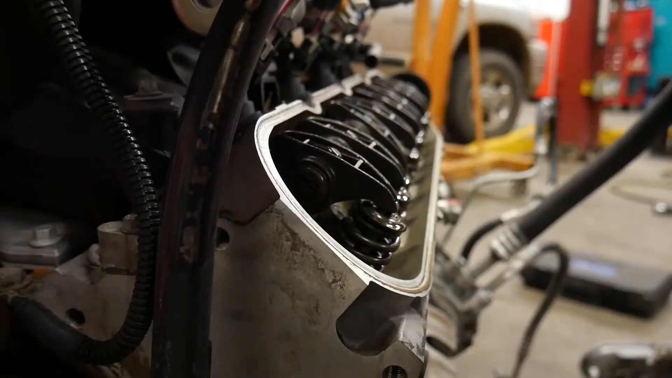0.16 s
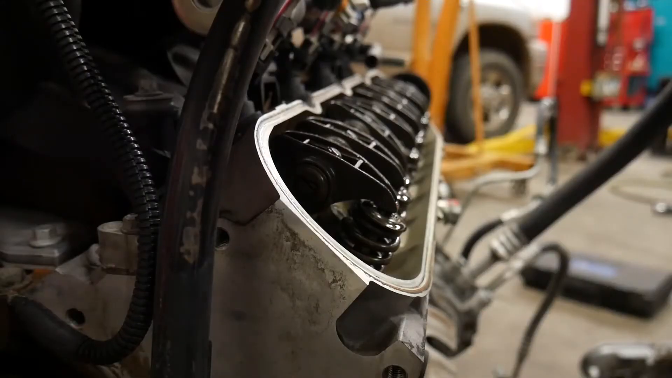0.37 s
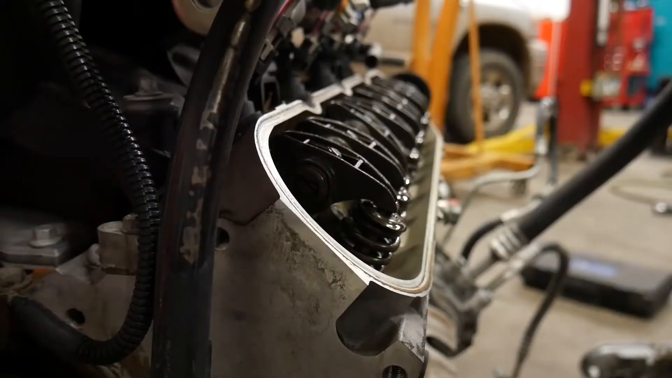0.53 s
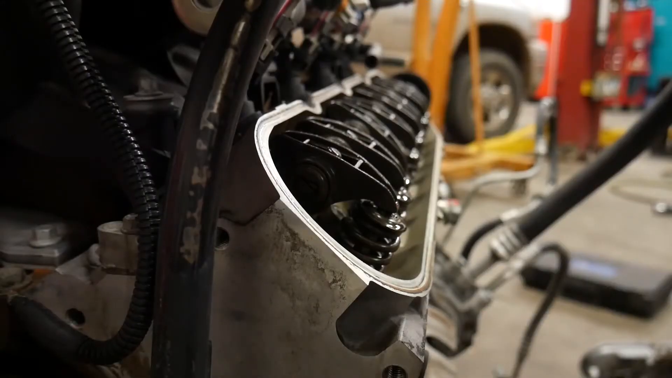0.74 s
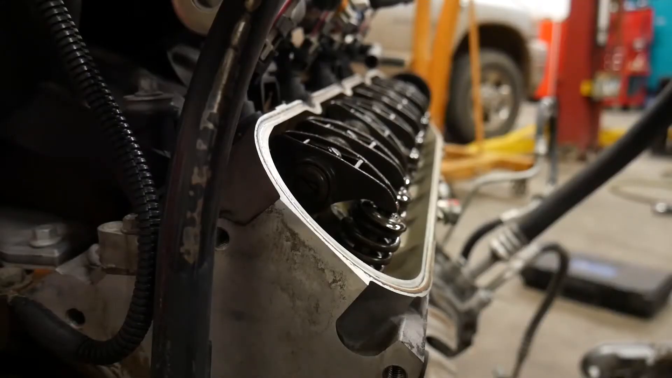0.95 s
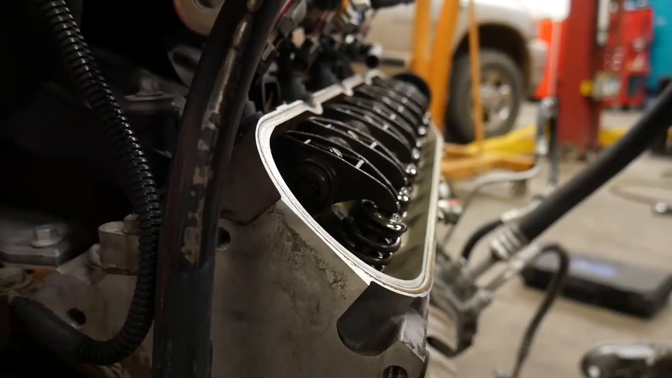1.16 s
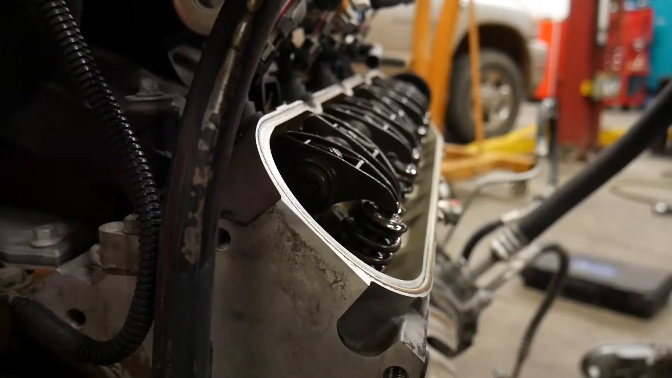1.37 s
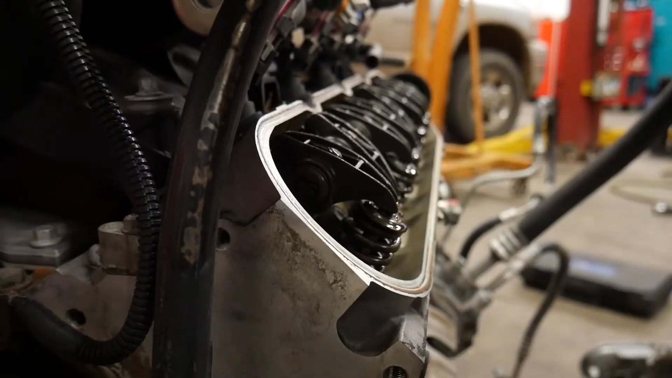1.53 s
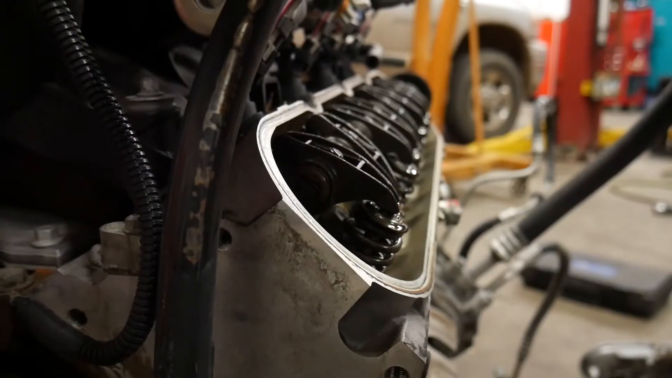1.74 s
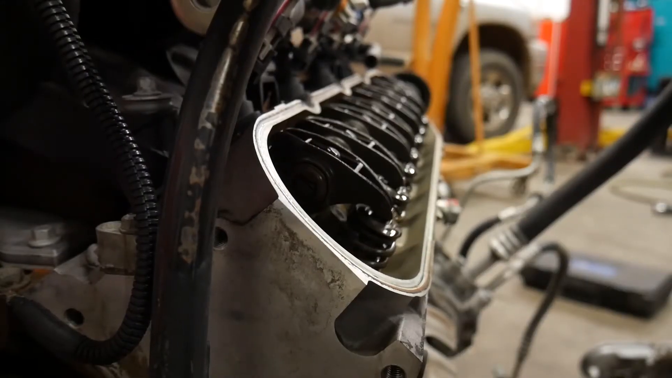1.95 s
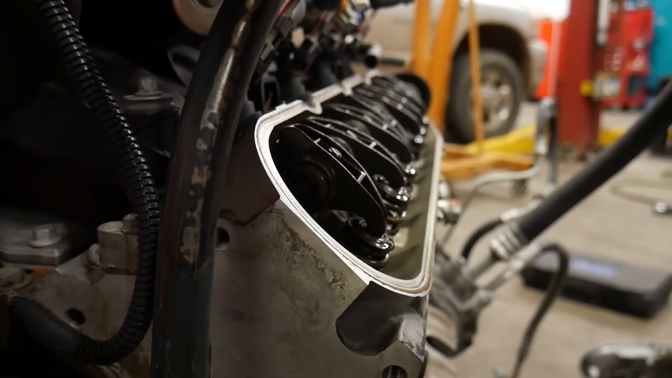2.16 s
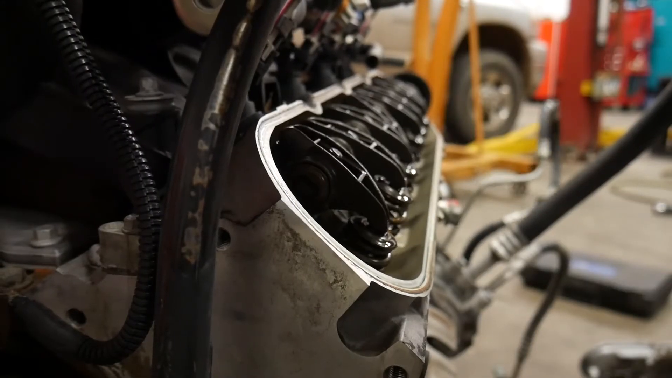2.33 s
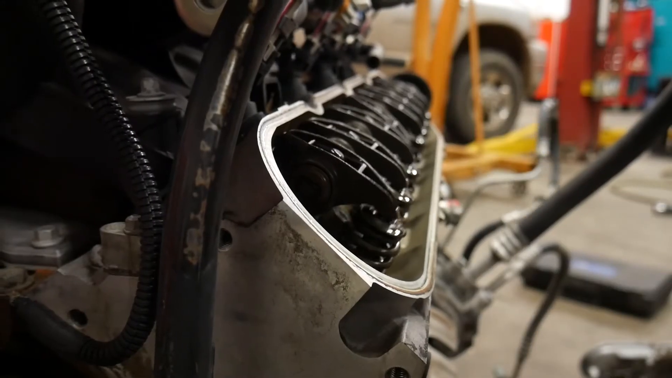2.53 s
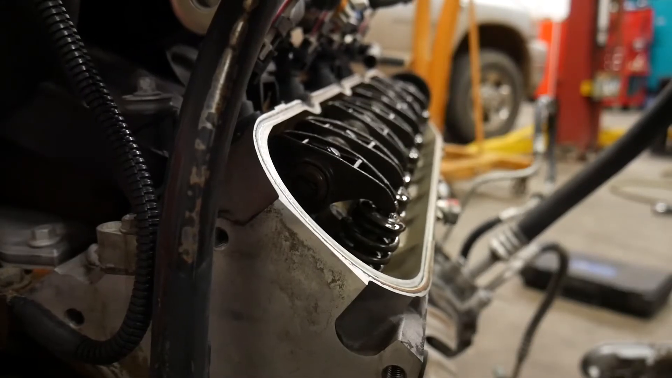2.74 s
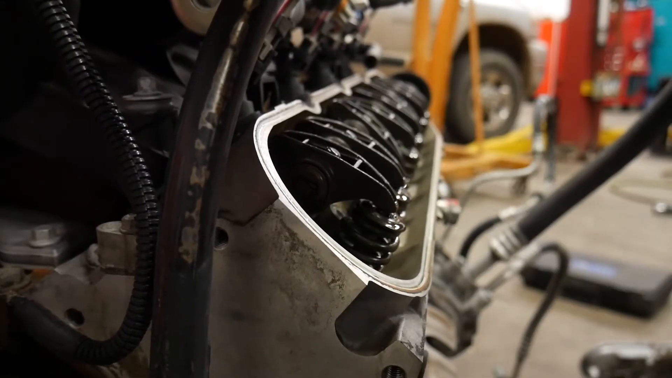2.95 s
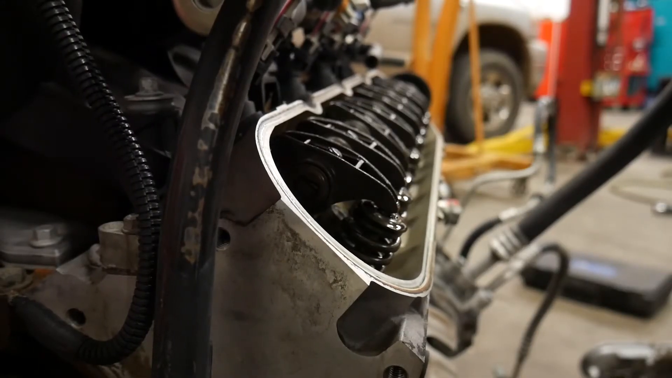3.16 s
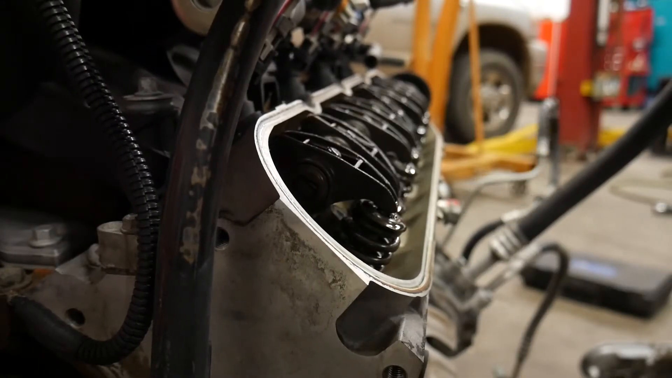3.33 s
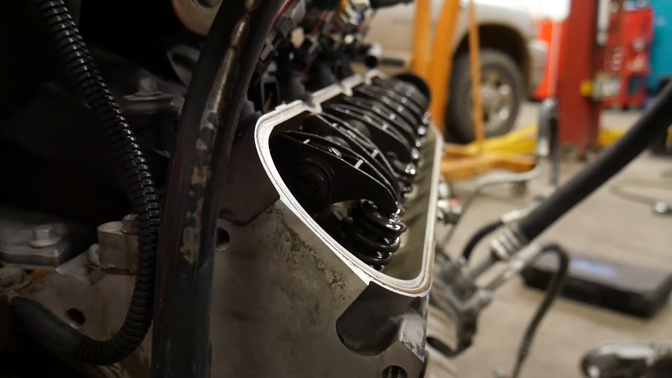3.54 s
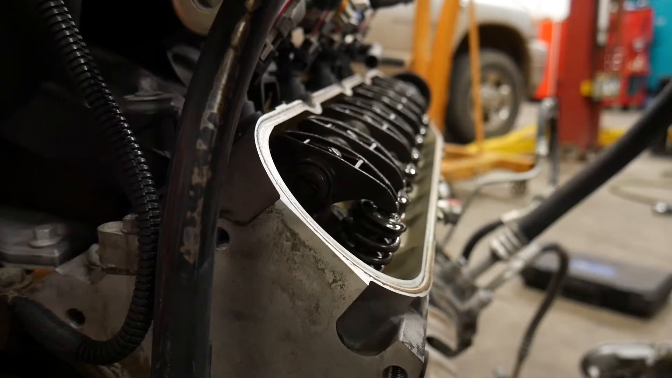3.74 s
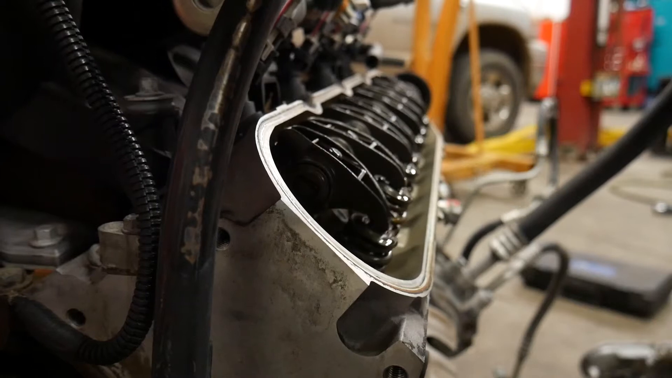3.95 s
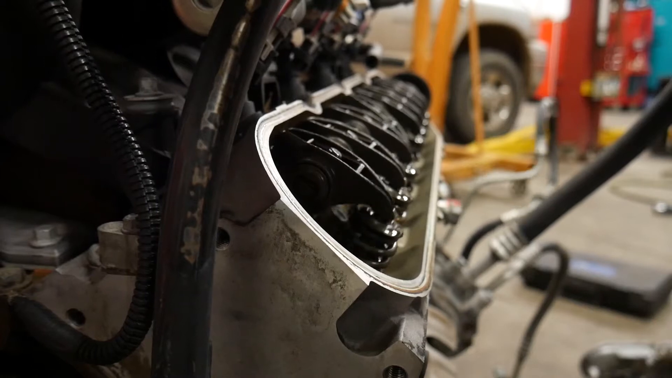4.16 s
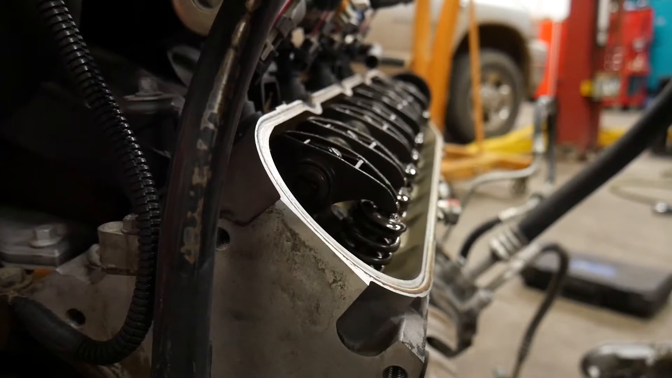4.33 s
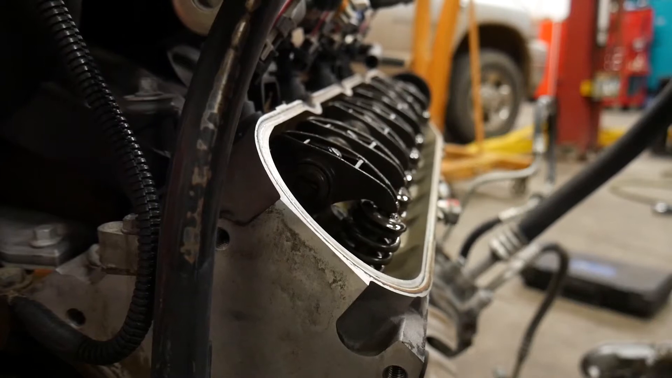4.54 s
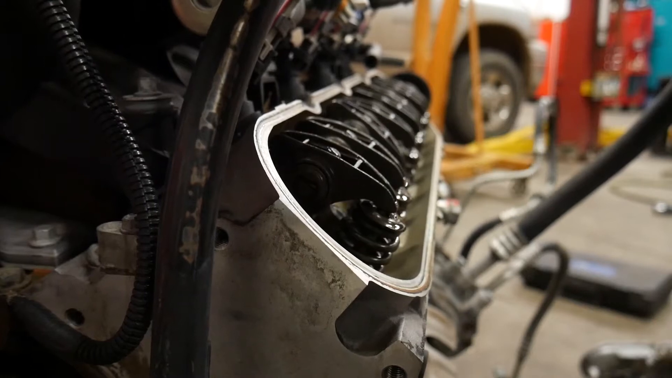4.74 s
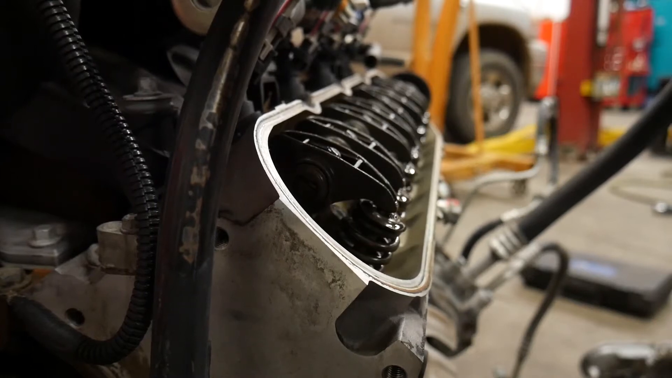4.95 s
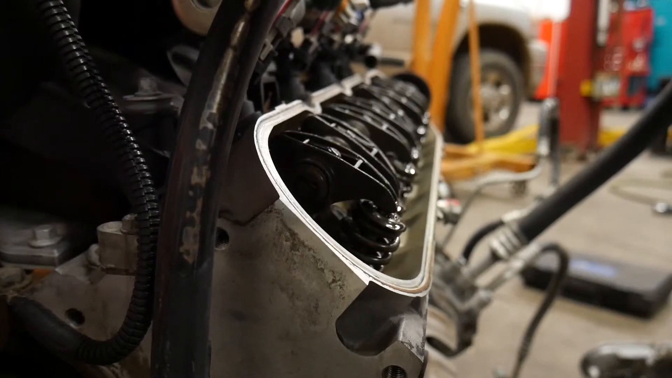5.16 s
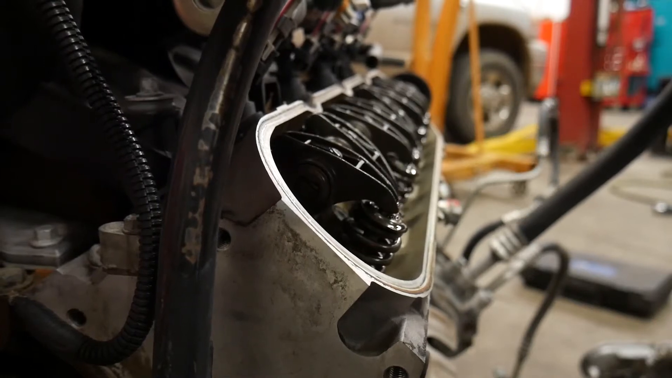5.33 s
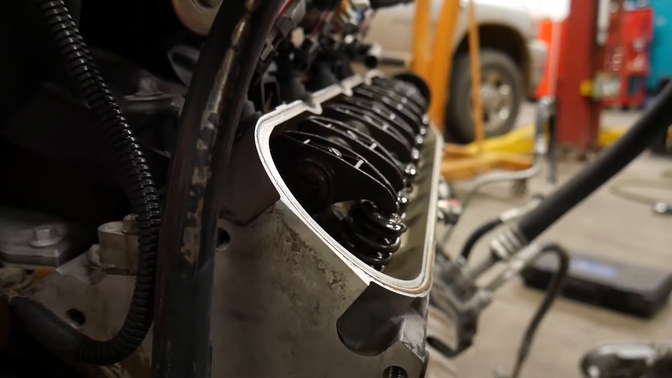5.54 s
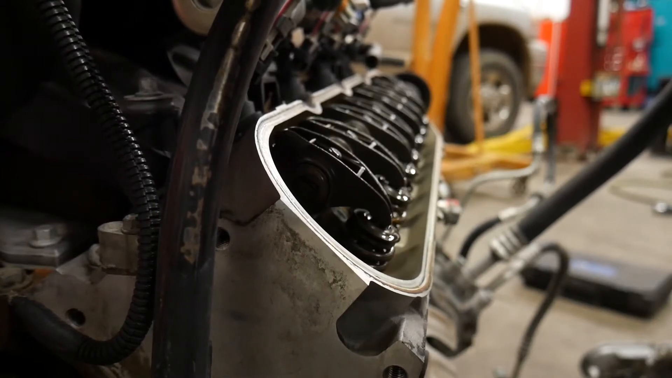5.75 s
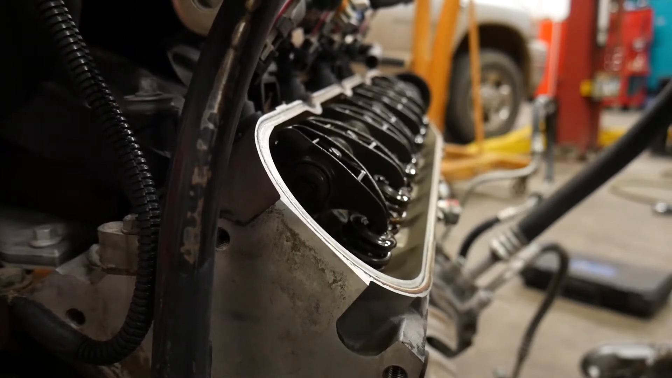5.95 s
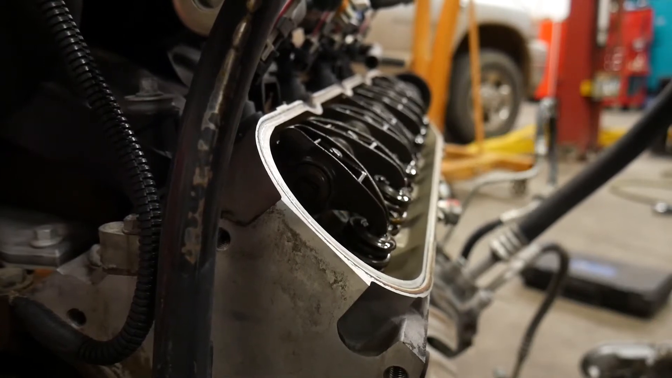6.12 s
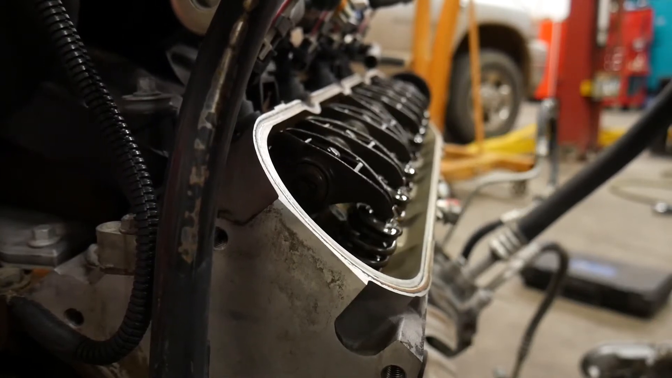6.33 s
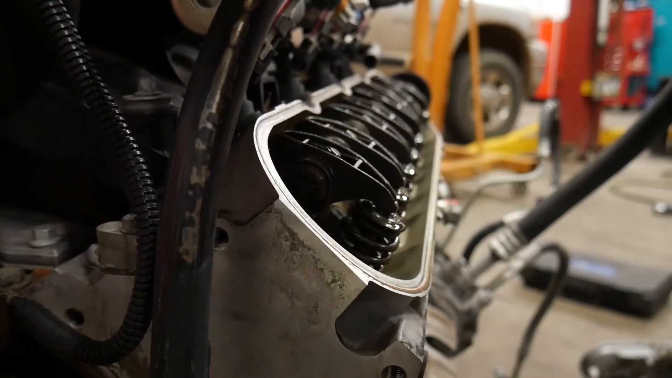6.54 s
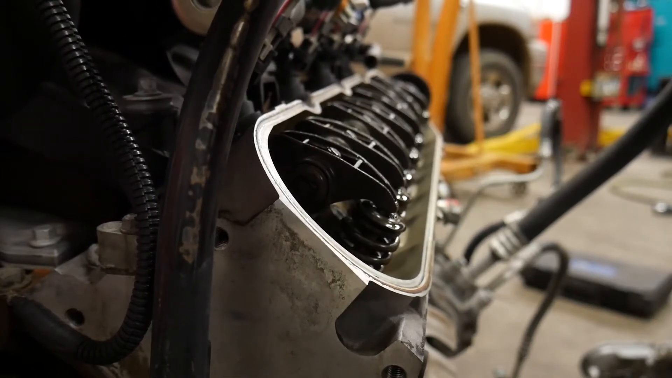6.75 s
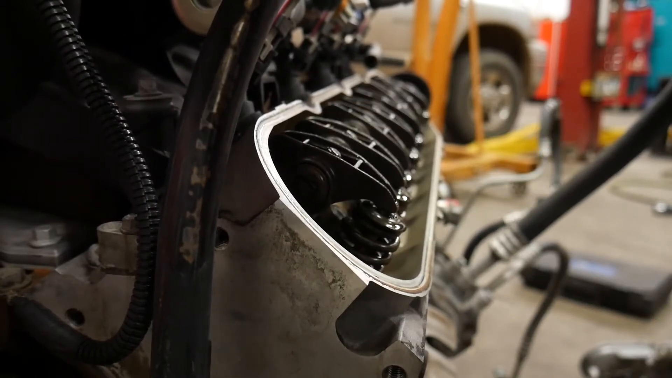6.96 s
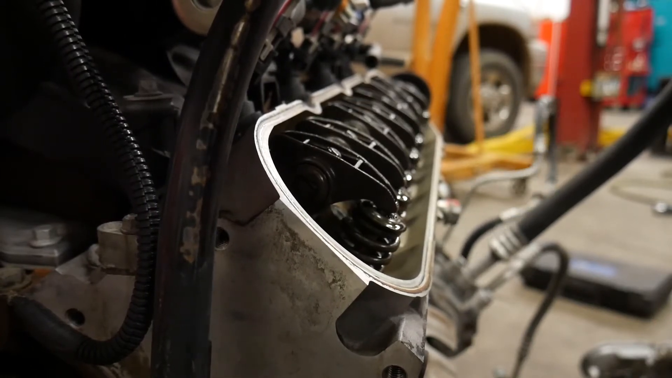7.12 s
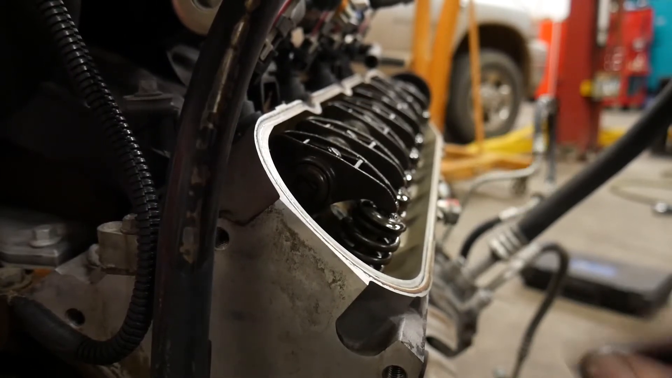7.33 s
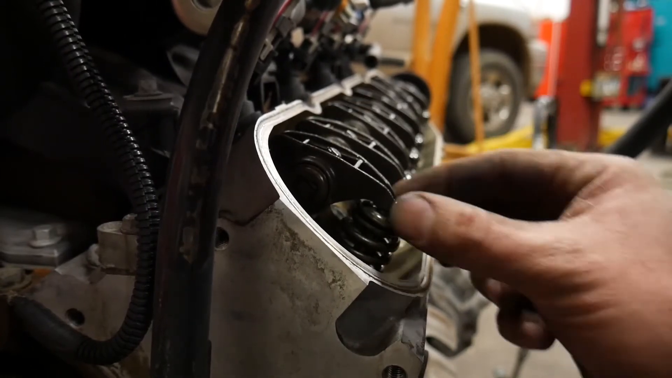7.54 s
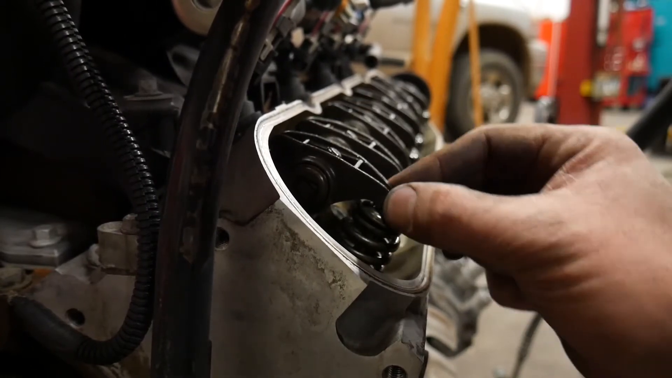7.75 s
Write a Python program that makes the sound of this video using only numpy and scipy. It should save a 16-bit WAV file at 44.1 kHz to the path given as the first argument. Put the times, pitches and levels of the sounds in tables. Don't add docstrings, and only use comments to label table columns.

```python
import sys
import numpy as np
from scipy import signal
from scipy.fft import rfft, irfft
from scipy.io import wavfile
from scipy.ndimage import uniform_filter1d

SR = 44100
rng = np.random.default_rng(int(sys.argv[2]) if len(sys.argv) > 2 else 0)


def waveform_to_disk(signal):
    frames = np.transpose(np.atleast_2d(signal))
    scaled = np.clip(frames, -1, 1) * 32767
    samples = np.round(scaled).astype(np.int16)
    wavfile.write(sys.argv[1], SR, samples)


def decibels_to_gain(level_db):
    exponent = np.asarray(level_db, float) / 20
    return 10 ** exponent


N = 343403
T = np.arange(N) / SR
BINS = np.fft.rfftfreq(8192, 1 / SR)

# t/s, peak/dB
CLUNKS = [
    (1.053, 0.5),
    (1.727, 0.5),
    (2.487, 0),
    (3.153, 1),
    (3.865, 0),
    (4.617, 1.5),
    (5.321, 1),
    (6.139, 1.5),
]
# t/s, peak/dB, thud/dB, mesh just after/Hz, drag/(Hz per s)
RELEASES = [
    (1.175, -16.5, -33, 1006, 1988),
    (1.881, -15, -39.5, 1188, 1851),
    (2.630, -18.5, -32.5, 1177, 1819),
    (3.302, -19, -33.5, 1233, 1883),
    (4.039, -18, -43.5, 1303, 1925),
    (4.738, -17.5, -32.5, 1111, 1739),
    (5.443, -17.5, -41, 1111, 1847),
    (6.268, -16.5, -33, 1091, 1797),
]


def evened(x):
    return x / np.sqrt(np.mean(x ** 2) + 1e-20)


def peaked(x):
    return x / abs(x).max()


def read(points, hz):
    f, value = np.transpose(points)
    return np.interp(np.log(hz + 1), np.log(f + 1), value)


def add(mix, s, sound):
    part = mix[round(s * SR):][:len(sound)]
    part += sound[:len(part)]


def causal(gain):
    log = np.log(np.maximum(np.r_[gain, gain[-2:0:-1]], 1e-5))
    return np.fft.ifft(np.exp(np.conj(signal.hilbert(log)))).real[:len(gain)]


def coloured(x, points):
    return signal.oaconvolve(x, causal(decibels_to_gain(read(points, BINS))))[:len(x)]


def wander(hz):
    slow = signal.butter(2, hz, fs=SR, output="sos")
    return evened(signal.sosfilt(slow, rng.standard_normal(N)))


def mesh_rate():
    # t/s, f/Hz
    spin_up = [(0, 0), (.022, 300), (.052, 667), (.077, 850), (.104, 1015), (.145, 1250), (.2, 1360)]
    mesh_delay_s, jolt_s = 0.008, 0.017
    full_hz, creep_hz = 1000, 69
    after_s, up_hz = np.transpose(spin_up)
    hz, load, jolt = np.full(N, -1e4), np.zeros(N), np.zeros(N)
    for (on, _), (off, _, _, start_hz, drag) in zip(CLUNKS, RELEASES):
        head_start = np.interp(hz[round(on * SR)], up_hz, after_s)
        rising = np.interp(T - on + head_start, after_s, up_hz)
        falling = start_hz - drag * (T - off)
        hz = np.where(T < on, hz, np.where(T < off, rising, falling))
        load[(T > on + mesh_delay_s) & (T < off)] = 1
        hz[(T > on) & (T < on + mesh_delay_s)] = hz[round(on * SR) - 1]
        jolt += np.exp(-((T - off) / jolt_s) ** 2)
    speed = np.maximum(hz + creep_hz, 0) / (full_hz + creep_hz)
    return [uniform_filter1d(v, size=400) for v in (np.maximum(hz, 0), load, speed, jolt)]


def motor():
    # order, level/dB
    loaded = [(1, -11.), (2, -13.), (3, -20.), (4, -11.), (5, -15.)]
    # order, level/dB
    coasting = [(1, -19.), (2, -9.5), (3, -11.5), (4, -11.), (5, -11.5)]
    # f/Hz, width/Hz, level/dB
    housing = [(458, 130, -13.5), (841, 178, -5), (1220, 152, 6), (2243, 74, -4), (2890, 100, -7.5),
               (3330, 30, -10.5), (4300, 100, -23.5), (5210, 150, -12.5), (6560, 400, -17.5),
               (6630, 170, -23), (7260, 100, -15.5), (7770, 51, -13.5), (8130, 68, -8.5), (8400, 19, -12),
               (8900, 72, -11.5), (9646, 150, -8), (10130, 230, -14), (10700, 98, -15), (11500, 270, -17.5)]
    # f/Hz, level/dB
    valleys = [(40, -60), (130, -18.5), (250, -21.5), (600, -24.5), (1500, -1.5), (3000, -15.5),
               (6000, -21.5), (9000, -24), (11500, -25.5), (13000, -25), (14500, -30.5), (16500, -29.5)]
    # f/Hz, level/dB
    whine_levels = [(1500, -60), (1900, -35), (2100, -25), (2550, -25), (2750, -35), (3300, -39),
                    (4000, -41)]
    # order, level/dB
    strands = [(1, -39.), (2, -41.), (4, -45.)]
    # loaded level/dB, its power of speed,
    # coasting level/dB, its power of speed, jolt at release/dB
    loudness = [(-24.5, .05, -27, 0.89, 1.6), (-25.5, 1.73, -26, 1.54, 0.5),
                (-37.5, 0.74, -37.5, 0.81, 6.6)]
    teeth, shaft_depth, knocks_per_s = 11, 0.087, 900
    hz, load, speed, jolt = mesh_rate()
    turns = np.cumsum(hz * (1 + 0.0162 * wander(44.8))) / SR

    tones = np.zeros(N)
    for (k, load_db), (_, coast_db) in zip(loaded, coasting):
        level = load * decibels_to_gain(load_db) + (1 - load) * decibels_to_gain(coast_db)
        contact = decibels_to_gain(np.minimum(6 * wander(24), 6) - 3)
        tones += level * contact * np.cos(2 * np.pi * (k * turns + rng.random()))

    throb = 1 + shaft_depth * np.cos(2 * np.pi * turns / teeth)
    knocks = (rng.random(N) < knocks_per_s / SR) * rng.choice([-1., 1.], N)
    brushes = rng.standard_normal(N) * decibels_to_gain(3 * np.tanh(.6 * wander(120)))
    grit = .55 * evened(knocks) + brushes
    drive = throb * (0.059 * grit + decibels_to_gain(-28.5) * tones)

    peaks = sum(decibels_to_gain(db) ** 2 / (1 + (2 * (BINS - f) / max(w, f / 70)) ** 2) ** 1.446 for f, w, db in housing)
    body = np.sqrt(peaks + decibels_to_gain(read(valleys, BINS)) ** 2)
    low = 1 / (1 + (BINS / 600) ** 8)
    high = 1 / (1 + (3500 / (BINS + 1)) ** 8)
    out, speed = np.zeros(N), abs(speed)
    spinning = hz > 300
    for row, share in zip(loudness, (1 - low - high, high, low)):
        load_db, load_power, coast_db, coast_power, jolt_db = row
        part = signal.oaconvolve(drive, causal(body * np.sqrt(abs(share))))[:N]
        level = load * decibels_to_gain(load_db) * speed ** load_power + (1 - load) * decibels_to_gain(coast_db) * speed ** coast_power
        out += level * decibels_to_gain(jolt_db * jolt) * part / part[spinning].std()

    whine_db = read(whine_levels, 3 * hz) + 4.5 * np.tanh(wander(80)) - 1
    whine = load * decibels_to_gain(whine_db) * np.cos(2 * np.pi * 3 * turns)
    for k, db in strands:
        whine += load * speed * decibels_to_gain(db + 6 * np.tanh(wander(50))) * np.cos(2 * np.pi * k * turns)
    return out + np.sqrt(2) * whine


def bell(x):
    # f/Hz, level/dB, t60/s
    modes = [(911, -38., 1.2), (2272, -39., 1.2)]
    t = np.arange(SR) / SR
    ring = sum(decibels_to_gain(db - 60 * t / t60) * np.sin(2 * np.pi * f * t) for f, db, t60 in modes)
    return signal.oaconvolve(x, ring / 20)[:N]


def clunks():
    # f/Hz, level/dB, t60/s
    strike = [(403, -7.5, 0.21), (1042, -5.5, 0.17), (1320, -2.5, 0.012), (1600, -28, 5.0),
              (2260, -31, 0.073), (2898, -7.5, 0.22), (3240, -50, 0.055), (3545, -24, 0.083),
              (4583, -26.5, 0.094), (6885, -18, 0.049), (7300, -29.5, 0.059), (8400, -39.5, 0.16),
              (11230, -20, 0.039), (11800, -32, 0.027)]
    # f/Hz, level/dB
    crack = [(59, -23.5), (100, -25), (552, -8), (1140, 3), (1680, -2.5), (2210, 2.5), (4030, -14.5),
             (5790, -13.5), (6450, -11.5), (7980, -12), (11200, -8.5), (13300, -17), (14500, -10),
             (15500, -13.5), (16500, -47)]
    t, out = np.arange(9000) / SR, np.zeros(N)
    contact = np.clip(t / 0.0013, 0, 1) ** 4 * (np.exp(-(t / 0.0067) ** 3) + 0.84 * np.exp(-t / 0.007))
    ring = sum(decibels_to_gain(db - 60 * t / min(t60, .06)) * np.sin(2 * np.pi * f * t) for f, db, t60 in strike)
    habit = rng.standard_normal(len(t))
    for s, db in CLUNKS:
        chatter = rfft(contact * (habit + .5 * rng.standard_normal(len(t))))
        chatter /= np.sqrt(uniform_filter1d(abs(chatter) ** 2, size=50))
        blow = irfft(chatter, len(t)) * (t > .0004)
        ringing = signal.oaconvolve(blow, ring)[:len(t)]
        sound = peaked(coloured(blow, crack)) + 0.21 * peaked(ringing)
        add(out, s, decibels_to_gain(db + 0.5) * peaked(sound))
    return out


def releases():
    # f/Hz, level/dB
    clack = [(2000, -14), (6000, -24), (9000, 3), (13000, 2.5), (15000, -0.5), (16500, -15)]
    t, out = np.arange(5000) / SR, np.zeros(N)
    shape = np.exp(-t / .004) * np.clip(t / 0.0018, 0, 1)
    shape = shape + .55 * np.roll(shape, round(.0125 * SR))
    thud = np.sin(2 * np.pi * 105 * t) * np.exp(-t / 0.028) * np.clip(t / 0.0022, 0, 1)
    for s, db, thud_db, _, _ in RELEASES:
        snap = peaked(coloured(shape * rng.standard_normal(len(t)), clack))
        add(out, s, decibels_to_gain(db + 7) * snap + decibels_to_gain(thud_db) * thud)
    return out


def ticks():
    # t/s, peak/dB, centre/Hz, width/share of the centre, treble/dB
    taps = [(.055, -46.5, 1500, 1.2, -4), (0.208, -37, 800, 0.47, -22.5), (.262, -46, 2520, 0.86, 1),
            (0.2858, -30, 2490, 1.2, 6), (0.403, -35.5, 2400, 0.86, 5), (0.429, -44, 2400, 0.62, 14),
            (.437, -50, 2400, 1.3, 5), (.489, -56, 9000, 1., 2), (.506, -44.5, 9300, 0.89, 2),
            (.774, -56, 11100, 1., -3), (.940, -44.5, 2170, 1.1, -3), (1.025, -34, 1920, 0.6, -9),
            (1.6994, -34, 2010, .5, -9), (2.433, -37, 1960, 0.99, -10), (6.111, -33.5, 1975, 0.74, -8.5),
            (7.1232, -42, 1860, 0.75, -13.5), (7.194, -36.5, 1100, 0.65, -25),
            (7.197, -28.5, 1980, 0.38, -25), (7.2015, -35.5, 3200, 0.38, -17),
            (7.250, -33.5, 836, 0.84, -41), (7.2655, -52, 2300, .6, -18), (7.218, -52, 9000, 1., 0),
            (7.592, -64, 9000, 1.4, -0.5)]
    t, out = np.arange(1500) / SR, np.zeros(N)
    for s, db, f, share, treble_db in taps:
        gain = 1 / (1 + ((BINS / f - f / (BINS + 1)) / share) ** 2)
        gain += decibels_to_gain(treble_db - 6) / (1 + (4500 / (BINS + 1)) ** 4)
        puff = rng.standard_normal(len(t)) * np.exp(-(t / .005) ** 2) * np.clip(t / .0008, 0, 1)
        add(out, s, decibels_to_gain(db) * peaked(signal.oaconvolve(puff, causal(gain))[:len(t)]))
    return out


def groans():
    # t/s, length/s, f/Hz, glide/Hz, level/dB
    creaks = [
        (1.3, 0.12, 190, -7.5, -45.5),
        (4.87, 0.085, 189, 0.5, -45.5),
        (5.136, .15, 167.7, 3.5, -41),
        (6.566, 0.25, 163, 22, -49),
    ]
    out = np.zeros(N)
    for s, length, hz, glide, db in creaks:
        t = np.arange(0, length, 1 / SR)
        shake = 1 + .03 * wander(25)[:len(t)]
        pitch = (hz + glide * (t / length - .5)) * shake
        tone = np.sin(2 * np.pi * np.cumsum(pitch) / SR) * signal.windows.tukey(len(t), .6)
        add(out, s, np.sqrt(2) * decibels_to_gain(db) * tone)
    return out


def strokes():
    # t/s, length/s, level/dB, swell over the stroke/dB
    drags = [
        (0.017, 0.22, -67, -7),
        (0.242, 0.2, -55, -7.5),
        (.485, 0.061, -71, -3),
        (7.038, .092, -72, 9.5),
        (7.202, 0.41, -67.5, -4.5),
    ]
    rise_s, fall_s = 0.022, 0.013
    out = np.zeros(N)
    for s, length, db, swell_db in drags:
        hold = decibels_to_gain(db + swell_db * np.clip((T - s) / length, 0, 1))
        fall = np.exp(-np.maximum(T - s - length, 0) / fall_s)
        out += hold * np.clip((T - s) / rise_s, 0, 1) * fall
    return out


def rustle():
    grain = rng.standard_normal(N) * decibels_to_gain(2.8 * wander(90))
    rub = coloured(grain, [(800, -24.5), (1700, -5), (2400, -1), (3200, -8.0), (4200, -13),
                           (9000, -10), (16000, -11)])
    return strokes() * evened(rub)


def background():
    # f/Hz, level/dB
    machinery = [(12, -43.5), (22, -20.5), (50, -2), (75, 0), (100, -12.5), (145, -9), (175, -16.5),
                 (290, -54.5)]
    # f/Hz, level/dB
    shop = [(110, -29), (200, -5), (355, -8), (570, -12), (850, -10), (1150, -13), (1500, -23), (2020, -30),
            (2740, -29), (4560, -32), (13700, -33), (16500, -36)]
    # t/s, level/dB
    shop_level = [(0, -59.5), (.5, -65), (1, -62), (6.9, -58.5), (7.3, -60), (7.55, -62), (7.79, -63)]
    rumble = evened(coloured(rng.standard_normal(N), machinery))
    hum = decibels_to_gain(-61) * np.sqrt(2) * np.sin(2 * np.pi * 120 * T) * (1 + .3 * wander(4))
    hiss = evened(coloured(rng.standard_normal(N), shop))
    hiss *= decibels_to_gain(np.interp(T, *np.transpose(shop_level)))
    return decibels_to_gain(-54 + wander(1.4)) * rumble + hiss + hum


def room(x):
    # f/Hz, t60/s
    decay = [(200, 0.35), (1000, 0.073), (4000, 0.62), (12000, 0.13)]
    hz, t, z = signal.stft(rng.standard_normal(SR // 2), SR, nperseg=256)
    fade = decibels_to_gain(-60 * t / np.maximum(read(decay, hz), .05)[:, None])
    tail = signal.istft(z * fade, SR, nperseg=256)[1]
    return signal.oaconvolve(x, np.r_[np.zeros(300), tail] / np.linalg.norm(tail))[:N]


def scene():
    small = signal.butter(2, 120, "high", fs=SR, output="sos")
    turning = motor()
    near = turning + bell(turning) + signal.sosfilt(small, clunks()) + releases() + groans()
    return (near + decibels_to_gain(-14.5) * room(near) + ticks() + rustle() + background())[None]


def top_cut(x):
    return signal.sosfilt(signal.butter(12, 17010, fs=SR, output="sos"), x)


def record(dry):
    held = np.tanh(dry * 1.1) / 1.1
    edge = signal.firwin(301, 15780, window=("kaiser", 6), fs=SR)[None]
    mix = signal.oaconvolve(held, edge, "same") + decibels_to_gain(-48.0) * held
    return top_cut(mix)


dry = scene()
out = record(dry)
waveform_to_disk(out)
```